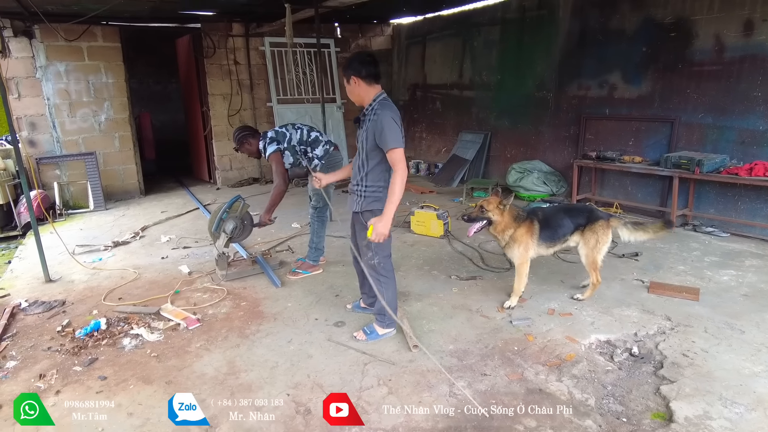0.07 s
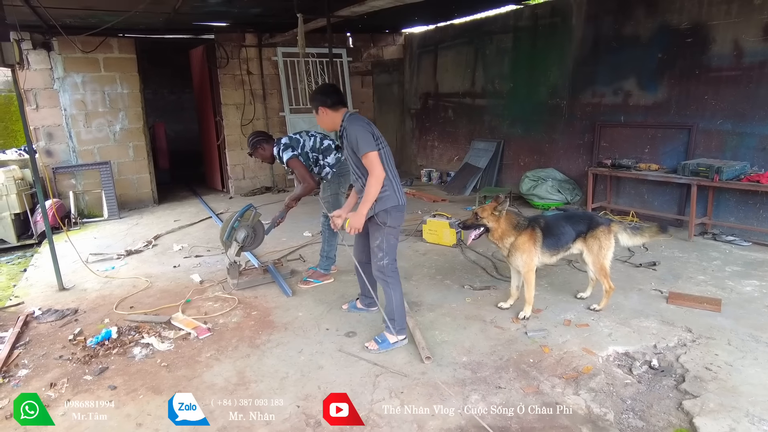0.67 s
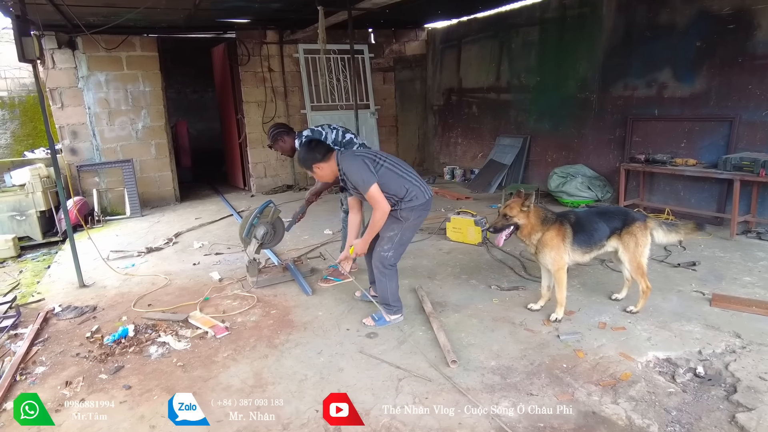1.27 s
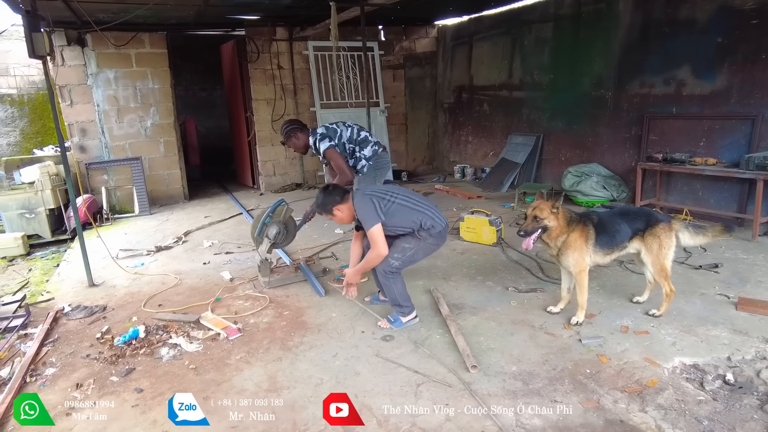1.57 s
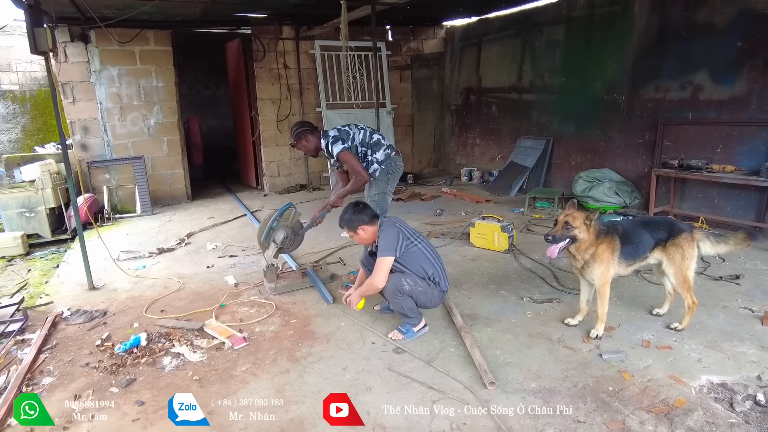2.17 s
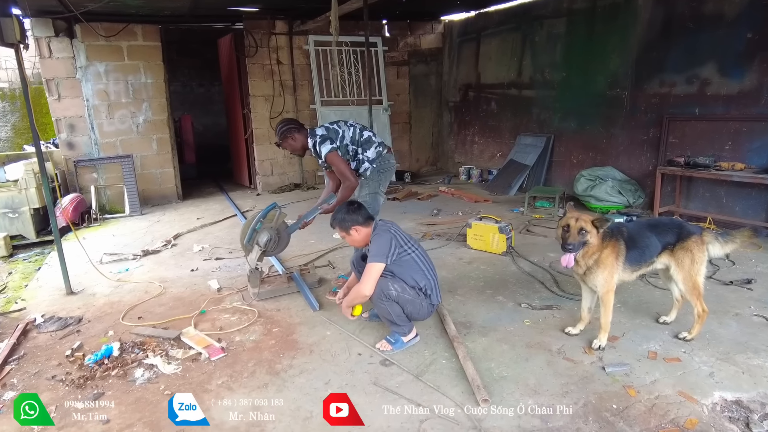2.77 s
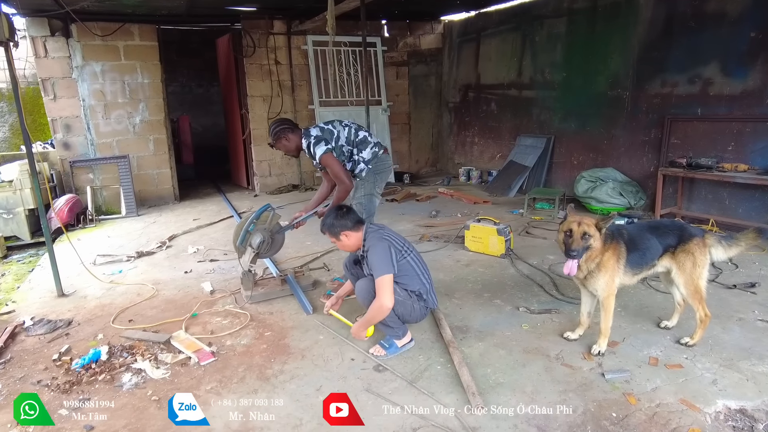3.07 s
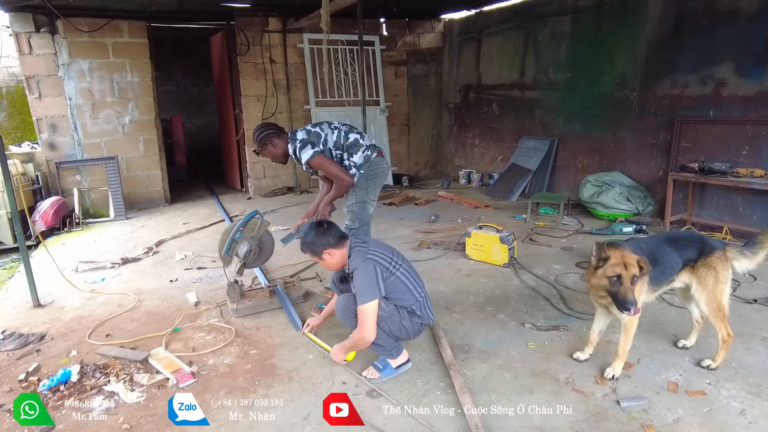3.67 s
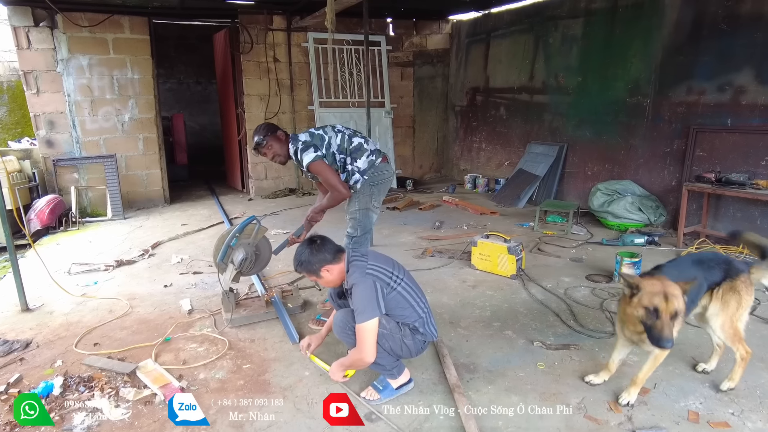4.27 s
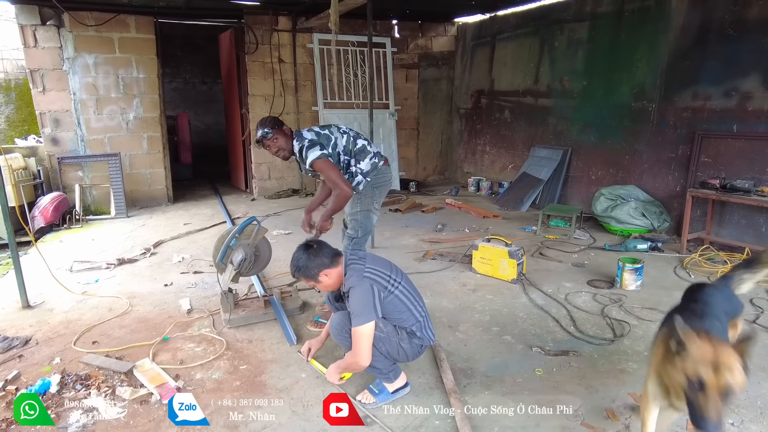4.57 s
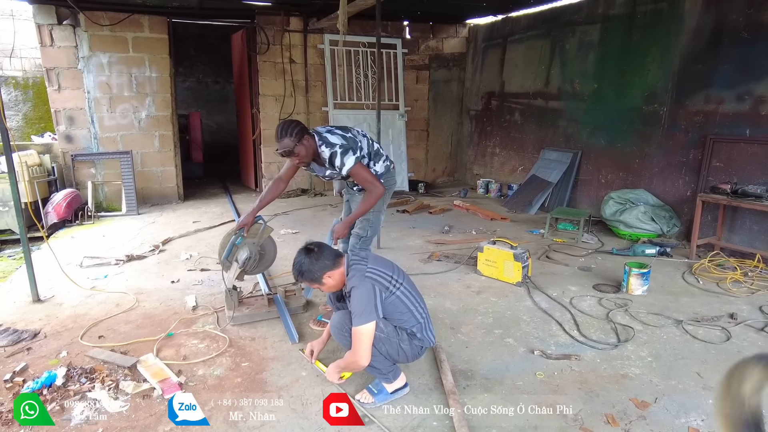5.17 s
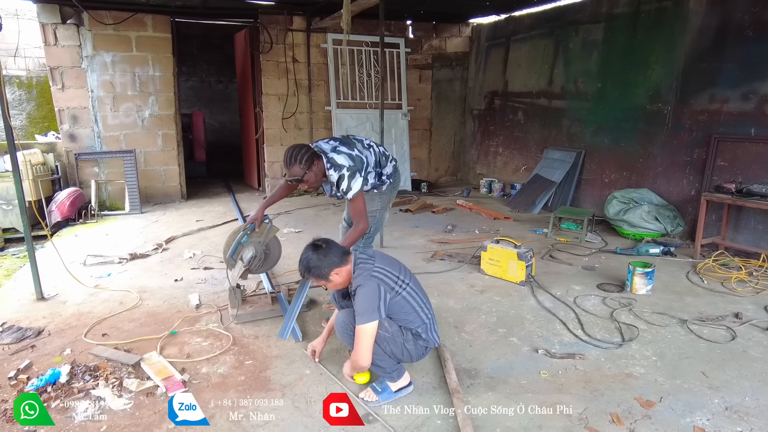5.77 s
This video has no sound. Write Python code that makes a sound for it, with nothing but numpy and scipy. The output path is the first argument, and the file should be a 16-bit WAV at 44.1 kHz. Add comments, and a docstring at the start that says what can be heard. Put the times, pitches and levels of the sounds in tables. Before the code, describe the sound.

An abrasive chop saw grinds through an iron bar with a harsh hiss, high motor whine and brief squeals, then starts slowing.

```python
"""An abrasive chop saw grinds through an iron bar in an open workshop, a few metres away.
From the start the motor whines, its fan rushes, sparks fizz, and grit tearing at the iron gives a harsh
hiss that throbs with each turn of the wheel. After half a second the cut begins to pinch now and then,
and bar and wheel sing out briefly. Near two seconds the wheel presses hardest and the motor sags.
At 5.3 seconds the switch is released and the motor starts to coast down."""
import sys
import numpy as np
from scipy import signal
from scipy.fft import rfft, irfft, next_fast_len
from scipy.io import wavfile
from scipy.ndimage import uniform_filter1d

SR = 44100
rng = np.random.default_rng(int(sys.argv[2]) if len(sys.argv) > 2 else 0)


def store_wav(level_fs):
    """Save 16-bit WAV to argv[1]."""
    pcm = np.round(np.clip(np.atleast_2d(level_fs), -1, 1) * 32767)
    wavfile.write(sys.argv[1], SR, pcm.T.astype(np.int16))


N = 264688
TIME = np.arange(N) / SR
GEAR_RATIO = 7.31  # motor turns for one turn of the wheel
OFF_S, HALF_SPEED_S = 5.3, 3.2  # when the switch is released; time for air drag to halve the speed


def amp(db):
    """Turns decibels into a gain."""
    return np.exp(np.asarray(db) * (np.log(10) / 20))

def evened(x):
    """Scales a signal to an average (rms) size of 1."""
    return x / np.sqrt(np.mean(x ** 2) + 1e-20)

def curve(rows):
    """Joins (second, value) points with straight lines."""
    return np.interp(TIME, *np.transpose(rows))

def swells(rows, edge_s):
    """Level changes that come, hold and go, added up in dB."""
    return sum(db * np.clip((length / 2 - abs(TIME - s)) / edge_s, 0, 1) for s, length, db in rows)

def level_at(spectrum, hz):
    """Looks up a spectrum's dB at the given frequencies."""
    points_hz, db = np.transpose(spectrum)
    return np.interp(np.log(hz + 1), np.log(points_hz + 1), db)

def wander(rate_hz):
    """A smooth random wobble of average size 1."""
    hz = np.fft.rfftfreq(4096, 1 / 600)
    slow = irfft(rfft(rng.standard_normal(4096)) * np.exp(-(hz / rate_hz) ** 2))
    return evened(np.interp(TIME * 600, np.arange(len(slow)), slow))

def patches(shape, size):
    """Smooth random patches; size is (frequency steps, time steps)."""
    field = rng.standard_normal(shape)
    for axis in (0, 1, 0, 1):
        field = uniform_filter1d(field, size[axis], axis)
    return evened(field)

def colour(x, spectrum, patchy_db, ring_db=0):
    """Shapes noise by a spectrum, with broad brief surges and narrow, longer rings."""
    hz, _, slices = signal.stft(x.astype(np.float32), SR, nperseg=2048, noverlap=1536)
    surges_db = patchy_db * patches(slices.shape[1:], size=(24, 3))
    rings_db = ring_db * patches(slices.shape[1:], size=(3, 9))
    slices = slices * amp(level_at(spectrum, hz)[:, None] + surges_db + rings_db)
    return evened(signal.istft(slices, SR, nperseg=2048, noverlap=1536)[1][:, :N])

def resonances(modes):
    """The spectrum of a few steep-sided ringing peaks."""
    hz = np.geomspace(20, SR / 2, 1500)
    power = sum(amp(db) ** 2 / (1 + ((hz - f) / (0.79 * width)) ** 2) ** 3 for f, width, db in modes)
    return np.column_stack([hz, 10 * np.log10(power + 1e-9)])

def noise(channels=2):
    """White noise; two channels are mid (shared by both ears) and side (their difference)."""
    return rng.standard_normal((channels, N), dtype=np.float32)

def coasting():
    """Seconds since the switch was released."""
    return np.maximum(TIME - OFF_S, 0)

# The motor's speed under power. Each row: time in seconds, turns per second.
MOTOR_SPEED = [(0, 381), (.12, 380.7), (.66, 387.9), (1.1, 383.9), (1.8, 382.8), (2.05, 379.2),
               (2.35, 384.3), (3.4, 383), (3.8, 387.2), (4.2, 389.5), (4.38, 388.1), (4.9, 390.7),
               (5.3, 390.9)]

def motor_turns():
    """Counts the shaft's turns; air drag slows it once the switch is released."""
    return np.cumsum(curve(MOTOR_SPEED) / (1 + coasting() / HALF_SPEED_S)) / SR

def strain():
    """How far the powered motor sags, from 0 (fastest) to 1 (slowest)."""
    speed = curve(MOTOR_SPEED)
    return (speed.max() - speed) / np.ptp(speed)

# How hard the wheel is fed into the bar. Each row: time in seconds, ring of the bar in dB.
FEED = [(0, -39), (.45, -43), (.75, -31), (1.2, -27.5), (1.55, -24), (2, -21.5), (2.6, -25), (3.3, -25.5),
        (3.65, -23), (5.5, -22), (5.7, -25.5), (6, -28.5)]

def load():
    """How hard the wheel presses, in dB; 0 is the hardest."""
    db = curve(FEED)
    return db - db.max()

def tone(cycles, db, flutter_db, rate_hz):
    """One motor tone, which flutters as its reflections shift."""
    gain = np.sqrt(2) * amp(db + flutter_db * wander(rate_hz))
    return gain * np.sin(2 * np.pi * (cycles + rng.random()))

# The high whine. Each row: time in seconds, level in dB.
WHINE_LEVEL = [(0, -34), (.25, -29), (.52, -31), (.88, -16.5), (1.3, -32.5), (1.85, -26), (2.35, -29.5),
               (3.04, -26.5), (3.13, -20.5), (4.55, -20.5), (5.2, -25), (5.62, -25.5), (6, -38)]
# Brief dips in the whine. Each row: middle in seconds, length in seconds, change in dB.
WHINE_DIPS = [(1.075, .32, -16), (1.64, .24, -13), (4.31, .15, -15), (5.5, .14, -17)]
# Thin tones above the whine. Each row: multiple of the shaft speed, level in dB without strain.
THIN_TONES = [(28, -42), (38, -55)]

def motor_whine(turns):
    """The whine follows the shaft's speed; strain and coasting weaken the thin tones above it."""
    whine_db = curve(WHINE_LEVEL) + swells(WHINE_DIPS, edge_s=.04)
    flicker_db = 1.04 + 0.21 * np.clip(-19.5 - whine_db, 0, 12)  # a weaker whine flickers more
    whine = tone(19 * turns, whine_db, flicker_db, rate_hz=33)
    fade_db = -17 * strain() - 29 * coasting()
    return whine + sum(tone(k * turns, db + fade_db, flutter_db=4, rate_hz=50) for k, db in THIN_TONES)

def workshop(x, echo_db, decay_s):
    """Walls and roof add a soft echo, which smears a gliding tone."""
    t = TIME[:SR // 2]
    tail = rng.standard_normal(len(t)) * 1000 ** (-t / decay_s)
    echo = signal.oaconvolve(x, tail)[:N]
    return x + amp(echo_db) * np.std(x) * evened(echo)

# The shaft's overtones. Each row: multiple of the shaft speed, level in dB at the hardest feed.
OVERTONES = [(3, -45.5), (5, -43.5), (6, -53), (15, -59)]
# The shaft tone swells and fades. Each row: middle in seconds, length in seconds, change in dB.
SHAFT_SWELLS = [(1.12, .8, 5.5), (2.15, 0.55, -14), (3.25, 1.5, 2.5)]
# The drone an octave above it swells. Each row: middle in seconds, length in seconds, rise in dB.
DRONE_SWELLS = [(.02, 0.53, 15.5), (.62, 0.85, 11.5), (1.42, 0.54, 14), (2.1, 0.48, 16.5), (2.92, 1.36, 10)]

def motor_hum(turns):
    """The spinning shaft drones, and mains hum beats against a tone at twice the wheel's speed."""
    load_db = load()
    shaft = tone(turns, -43.5 + swells(SHAFT_SWELLS, edge_s=0.18), flutter_db=2.2, rate_hz=9.4)
    drone_db = -47.5 + swells(DRONE_SWELLS, edge_s=0.2) - 29 * coasting()
    drone = tone(2 * turns, drone_db, flutter_db=2, rate_hz=16)
    overtones = sum(tone(k * turns, db + .5 * load_db, flutter_db=3.5, rate_hz=7.4)
                    for k, db in OVERTONES)
    mains = tone(100 * TIME, -59 + load_db, flutter_db=1.8, rate_hz=6.8)  # twice the 50 Hz supply
    powered = np.interp(coasting(), [0, .1], [1, 0])
    wheel = tone(2 * turns / GEAR_RATIO, -63 + load_db, flutter_db=1.2, rate_hz=8)
    return shaft + drone + overtones + powered * mains + wheel

# The fan's tone colour. Each row: frequency in Hz, relative level in dB.
FAN_SPECTRUM = [(25, -38), (60, -37), (140, -17.5), (270, -15.5), (450, -2), (850, 3.5), (1300, 0.5),
                (1750, -7.5), (3400, 1.5), (4900, -30), (5500, -8.5), (7300, -1), (10000, -44),
                (15000, -25)]
# How strongly the fan rushes. Each row: time in seconds, relative level in dB.
FAN_LEVEL = [(0, -36), (1.1, -38), (2.4, -40), (2.95, -38), (3.3, -43), (5, -51), (5.55, -40.5), (6, -38.5)]

def fan_rush():
    """Swirling air rushes through the fan."""
    return amp(curve(FAN_LEVEL) + 9.5) * colour(noise(), FAN_SPECTRUM, patchy_db=1.87)

# Notes of the air in the wheel guard. Each row: pitch in Hz, width in Hz, relative level in dB.
GUARD_MODES = [(488.7, 9.6, 8), (512, 60, -1)]
# The booms. Each row: middle in seconds, length in seconds, rise in dB.
GUARD_BOOMS = [(.74, 0.74, 4.5), (3.1, 1, 3), (5.18, 0.38, 4), (5.82, 0.28, 4)]

def guard_boom():
    """Air dragged along by the wheel booms in its guard."""
    db = -34.5 - 4 * strain() + swells(GUARD_BOOMS, edge_s=0.17)
    return amp(db) * colour(noise(channels=1), resonances(GUARD_MODES), patchy_db=0.74)

# Notes of the steel frame. Each row: pitch in Hz, width in Hz, relative level in dB.
FRAME_MODES = [(330.5, 18.4, 1.5), (402, 13.5, -5), (425.6, 68, 1.5), (785, 69, -5.5), (895, 160, -3),
               (280, 230, -18.5)]

def frame_shake():
    """The cut shakes the saw's frame."""
    db = -33.5 + 0.5 * load() - 1.67 * strain()
    return amp(db) * colour(noise(channels=1), resonances(FRAME_MODES), patchy_db=1.1)

def grains(per_s, spread_db=2):
    """Grit strikes the iron: many tiny impacts, a few of them larger."""
    impacts = np.zeros((2, N))
    hit = rng.random((2, N)) < per_s / SR
    strength = np.minimum(rng.exponential(size=hit.sum()), 6)
    impacts[hit] = np.sign(noise()[hit]) * amp(spread_db * strength)
    return evened(impacts)

def throb(wheel_turns, depth):
    """The wheel is slightly out of round and bites harder once a turn."""
    bumps = sum(np.cos(2 * np.pi * (k * wheel_turns + rng.random())) / np.sqrt(k) for k in range(1, 6))
    return evened(np.exp(depth * evened(bumps)))

# The iron bar's tone colour. Each row: frequency in Hz, relative level in dB.
BAR_SPECTRUM = [(25, -46), (60, -49), (150, -22.5), (300, -13.5), (680, -10.5), (880, -4), (1200, -5.5),
                (1680, -5), (2050, -0.5), (2700, 1.5), (3300, -1), (4200, -14), (8000, -27)]
# The hiss's tone colour. Each row: frequency in Hz, relative level in dB.
GRIT_SPECTRUM = [(1500, -32.5), (2800, -12), (3700, 3.5), (4500, 3), (5400, 5), (6000, 2.5), (6800, 0.5),
                 (8000, 0.5), (8700, -2.5), (9900, -6.5), (10600, -15), (11500, -25), (13500, -28)]
# The wheel snatches or skips. Each row: middle in seconds, change of the hiss in dB.
BITES = [(.48, 3), (1.29, 1), (1.34, -1.5), (2.02, -1), (2.76, 5), (3.03, 2), (3.32, -6), (3.47, 1.5),
         (3.63, -4), (3.7, 2.5), (3.85, 0), (3.92, 1), (4.01, -2.5), (4.08, 0.5), (4.69, -2), (5.05, 1.5),
         (5.6, 1.5)]

def grinding(wheel_turns):
    """Grit rings the bar and hisses in the cut; both follow the feed and the wheel's bites."""
    bite_db = swells([(s, .09, db) for s, db in BITES], edge_s=.045) + .25 * wander(rate_hz=14)
    ring = colour(grains(per_s=18000), BAR_SPECTRUM, patchy_db=1, ring_db=1.5)
    ring *= amp(curve(FEED) + .55 * bite_db) * throb(wheel_turns, depth=0.048)
    chatter_db = 1.63 * wander(rate_hz=37)  # the wheel chatters in its slot
    hiss_db = -22 + 0.41 * load() + bite_db + chatter_db - 6 * coasting()
    hiss = colour(grains(per_s=18000), GRIT_SPECTRUM, patchy_db=1.3, ring_db=3)
    return ring + amp(hiss_db) * hiss * throb(wheel_turns, depth=0.07)

# The sparks' tone colour. Each row: frequency in Hz, relative level in dB.
SPARK_SPECTRUM = [(3000, -24), (6000, 4), (8000, 7), (9600, 4), (11000, 2.5), (12200, -6), (13600, -7),
                  (14700, -7.5), (15700, -11)]
# Showers of sparks. Each row: middle in seconds, length in seconds, change of the fizz in dB.
SHOWERS = [(.02, 0.27, 6), (1.15, 1.004, 6), (1.43, 0.31, 0.5), (2.0, 0.26, 6), (2.02, 0.081, -2),
           (2.93, 1.22, 3), (2.67, 0.4, 3.5), (3.23, 0.26, 3.5), (4.28, 0.25, 6)]
# High notes of the wheel's rim. Each row: pitch in Hz, width in Hz, relative level in dB.
RIM_MODES = [(9030, 220, 16), (12000, 260, -15), (12270, 480, 12)]

def sparks(wheel_turns):
    """The cut throws showers of fizzing sparks, which set the wheel's rim singing."""
    shower_db = swells(SHOWERS, edge_s=.06)
    fizz_db = -29.5 + 0.38 * load() + shower_db - 5 * coasting()
    fizz = colour(grains(per_s=16000), SPARK_SPECTRUM, patchy_db=1.4, ring_db=2.6)
    rim_db = -47.5 + 0.75 * load() + 2.1 * shower_db
    rim = colour(noise(), resonances(RIM_MODES), patchy_db=2.5, ring_db=4.5)
    return amp(fizz_db) * fizz * throb(wheel_turns, depth=.11) + amp(rim_db) * rim

# The cut pinches and wheel, bar or guard sings. Each row: middle in seconds, length in seconds,
# pitch in Hz, width in Hz, glide in Hz per second, level in dB.
SQUEALS = [(0.678, 0.33, 6500, 1050, 1, -29.5), (.85, 0.25, 11330, 200, -800, -40),
           (0.971, 1, 3520, 1000, 0, -29.5), (1.08, 0.28, 6200, 380, -8000, -30),
           (1.264, 0.14, 5700, 62, -7, -25), (1.374, 0.34, 8100, 350, 1000, -26),
           (1.562, 0.53, 4960, 340, 1805, -26.5), (1.763, .77, 2980, 400, 854, -25),
           (1.798, 0.16, 4300, 160, -3.5, -27), (1.947, .16, 9160, 110, 0, -31),
           (2.02, 0.12, 11900, 300, -2, -29), (2.581, 0.38, 4410, 120, 0, -30),
           (2.917, .21, 6300, 550, -1500, -20), (2.93, 0.096, 454, 10, 600, -31.5),
           (3.04, 0.21, 527, 8.6, 0, -27), (3.131, 0.49, 5530, 260, 0, -29.5),
           (3.26, 0.38, 8000, 500, 5, -32), (3.797, 1, 9200, 200, -7, -36.5),
           (4.297, 0.11, 9550, 160, -2, -29), (4.573, .08, 4740, 600, -12000, -27),
           (4.756, .09, 4730, 2100, 0, -24), (4.912, 0.13, 4030, 400, 5999.5, -28),
           (5.26, .12, 3530, 300, -3, -29), (5.957, 0.22, 6300, 220, -600, -31)]

def squeals():
    """Rubbing feeds one narrow resonance, which swells, slides as the cut deepens, and fades."""
    out = np.zeros((2, N))
    steps, steps_per_s = 1024, 4000
    hz = np.fft.fftfreq(steps, 1 / steps_per_s)
    for middle, length, pitch_hz, width_hz, glide, db in SQUEALS:
        at = np.flatnonzero(abs(TIME - middle) < length / 2)
        t = TIME[at] - middle
        force = rng.standard_normal((2, steps, 2)) @ [1, 1j]
        # smooth the rubbing force to the width of the resonance
        rub = np.fft.ifft(np.fft.fft(force) / (1 + (2 * hz / width_hz) ** 2))
        sway = np.array([np.interp(t * steps_per_s, np.arange(steps), r, period=steps) for r in rub])
        ring = (sway * np.exp(2j * np.pi * (pitch_hz * t + glide * t ** 2 / 2))).real
        out[:, at] += amp(db) * np.array([evened(r) for r in ring]) * np.cos(np.pi * t / length)
    return out

# How much left and right differ. Each row: frequency in Hz, gain of the side signal in dB.
STEREO_WIDTH = [(30, -70), (3020, -70), (3130, -5), (4500, -4.8), (6000, -4.2), (6800, -6.8), (7600, -9),
                (9500, -9.5), (10200, -13), (12000, -11), (13800, -6), (15000, -9.5)]

def scene():
    """Bass and motor tones sit in the middle; the hiss spreads left and right."""
    turns = motor_turns()
    wheel_turns = turns / GEAR_RATIO
    motor = workshop(motor_whine(turns), echo_db=-15, decay_s=0.5) + motor_hum(turns)
    machine = fan_rush() + guard_boom() + frame_shake()
    mid, side = machine + grinding(wheel_turns) + sparks(wheel_turns) + squeals()
    mid = mid + motor
    size = next_fast_len(N, True)
    width = amp(level_at(STEREO_WIDTH, np.fft.rfftfreq(size, 1 / SR)))
    side = irfft(rfft(side, size) * width, size)[:N]
    return np.array([mid + side, mid - side])

def record(dry):
    """Removes the very highest treble."""
    lowpass = signal.firwin(1023, cutoff=15730, window=("kaiser", 9), fs=SR)
    return signal.oaconvolve(dry, lowpass[None], "same")


dry = scene()
out = record(dry)
store_wav(out)
```